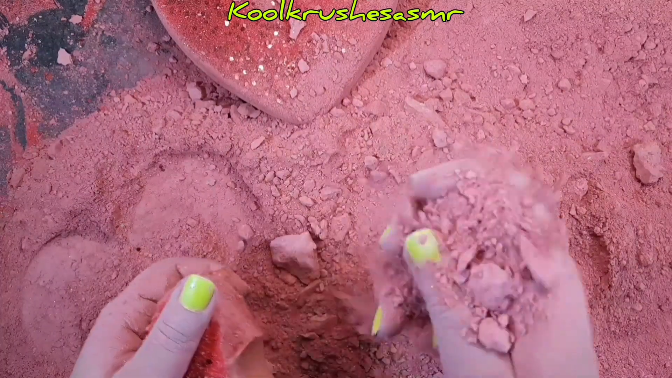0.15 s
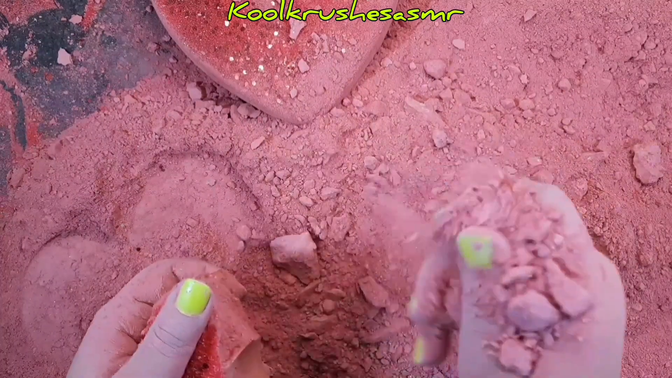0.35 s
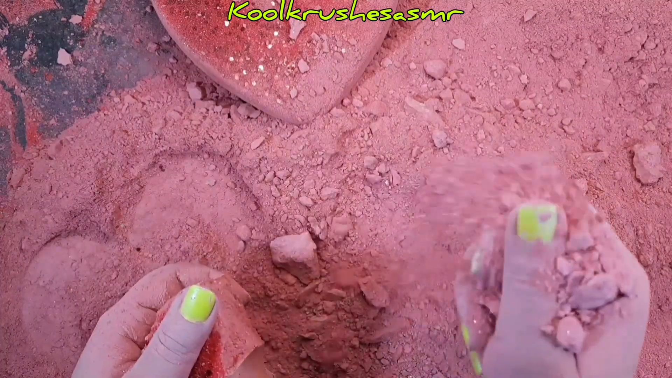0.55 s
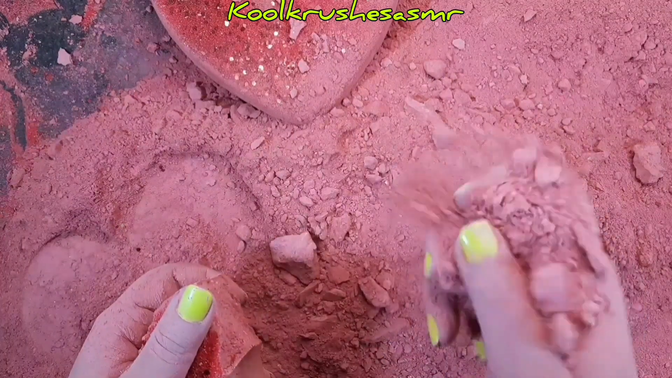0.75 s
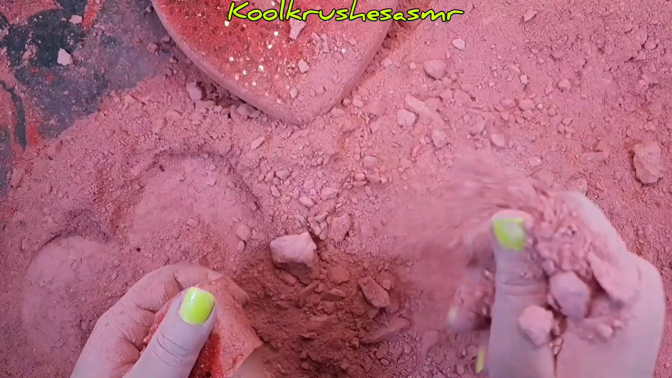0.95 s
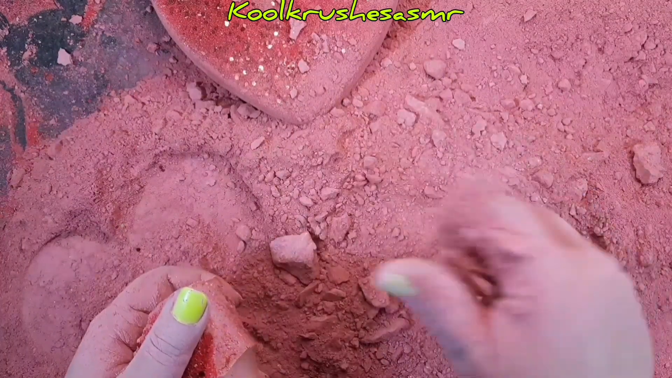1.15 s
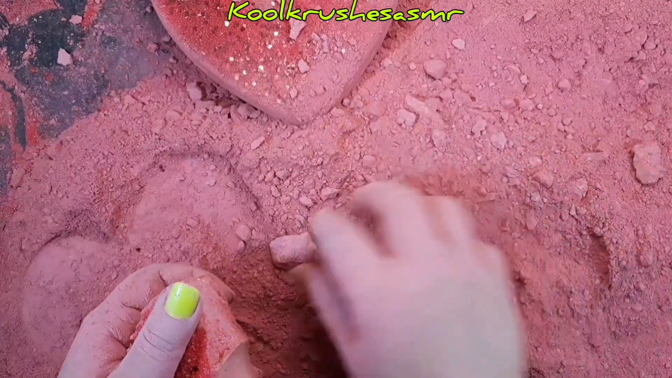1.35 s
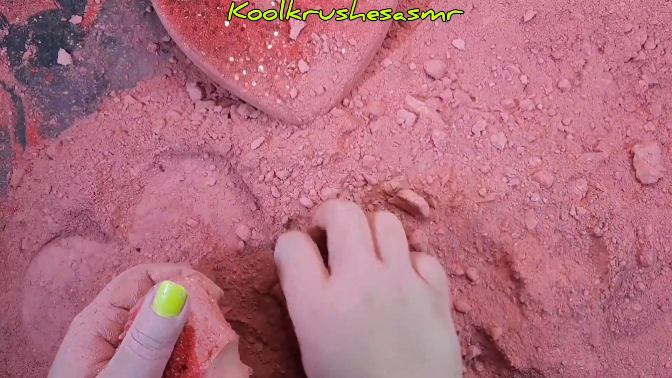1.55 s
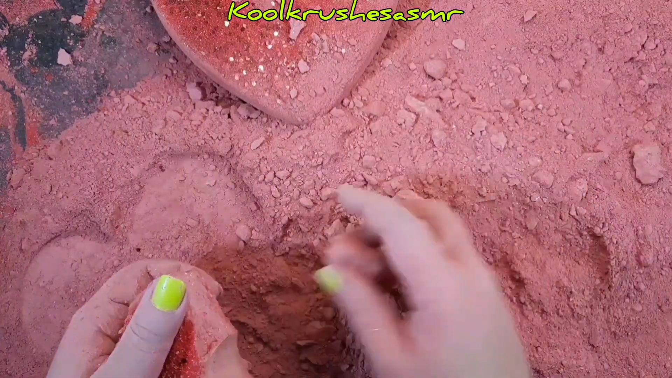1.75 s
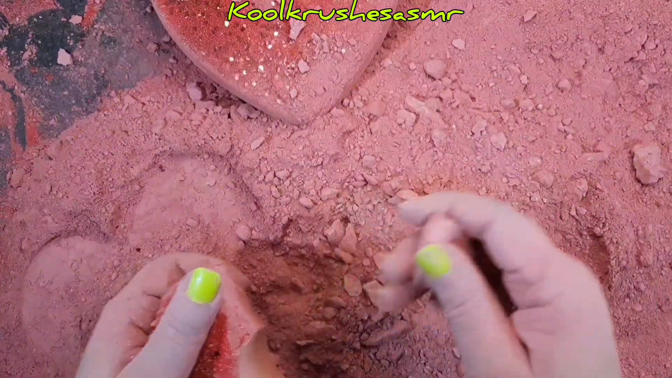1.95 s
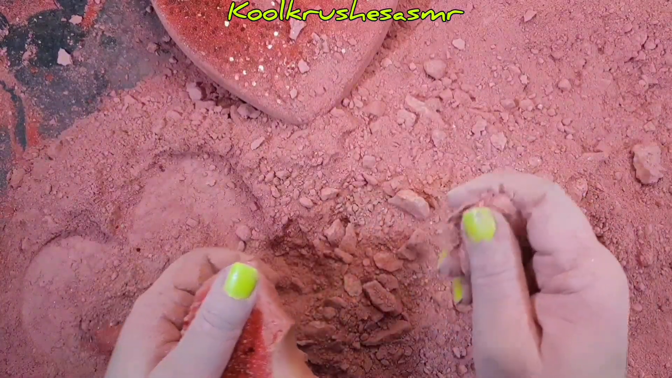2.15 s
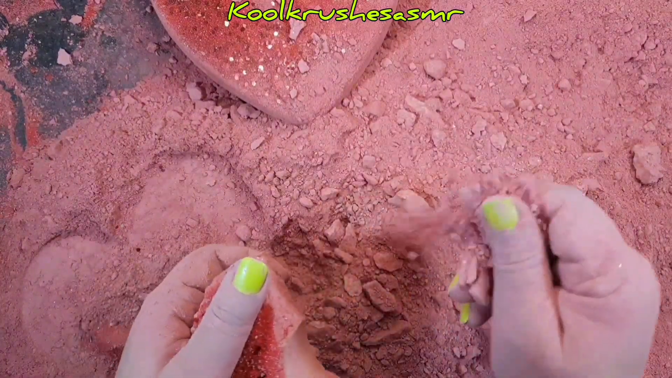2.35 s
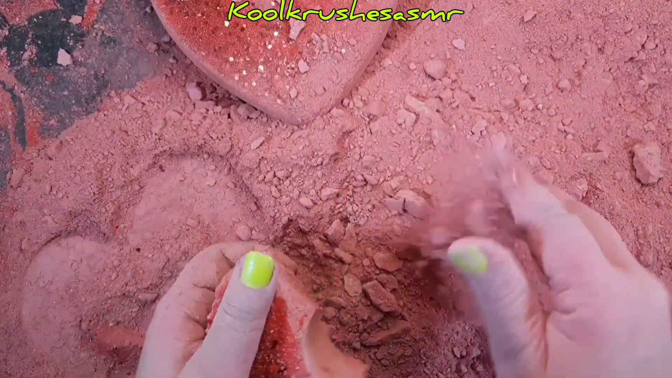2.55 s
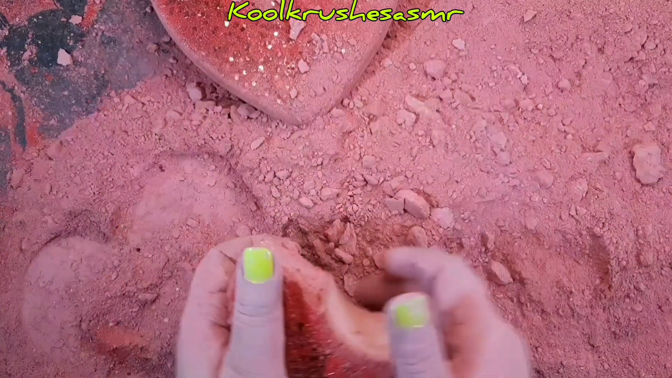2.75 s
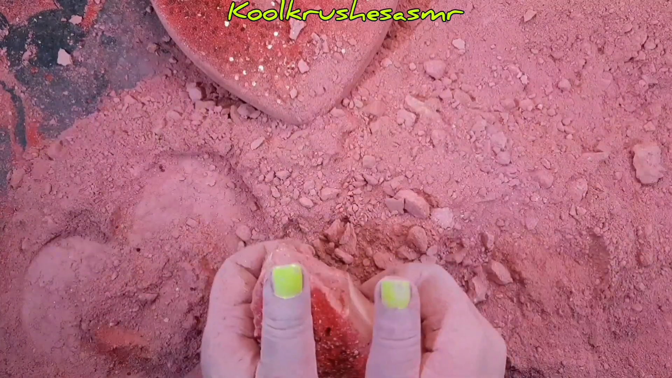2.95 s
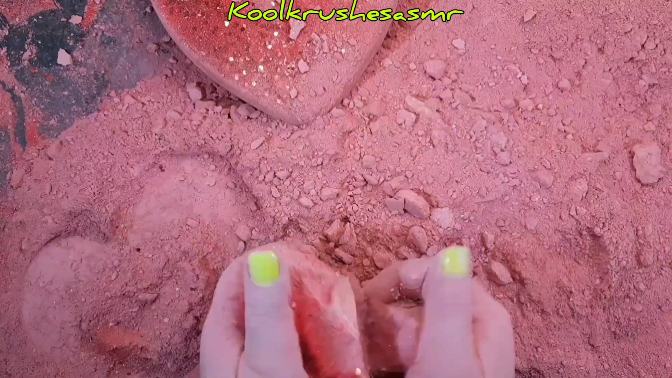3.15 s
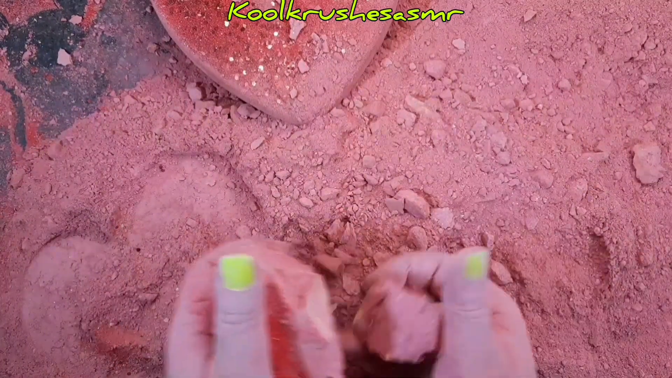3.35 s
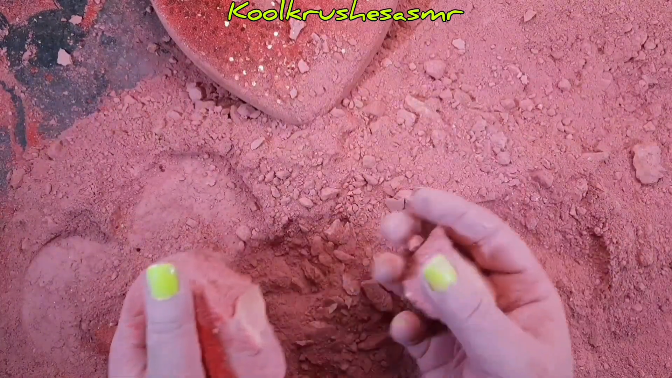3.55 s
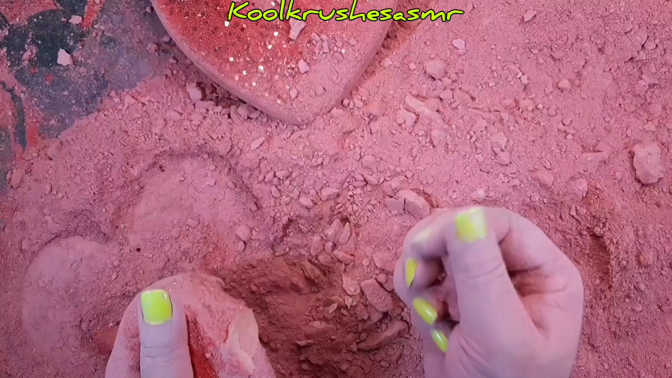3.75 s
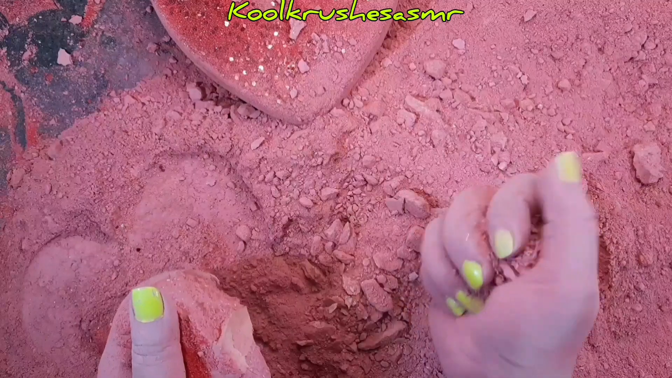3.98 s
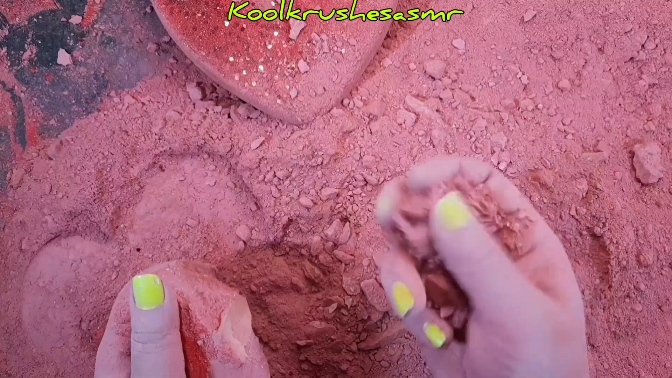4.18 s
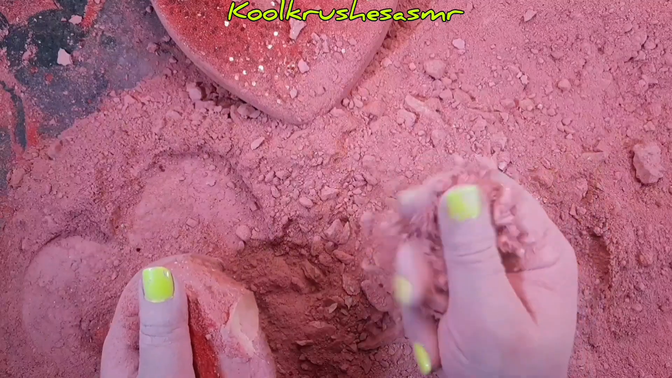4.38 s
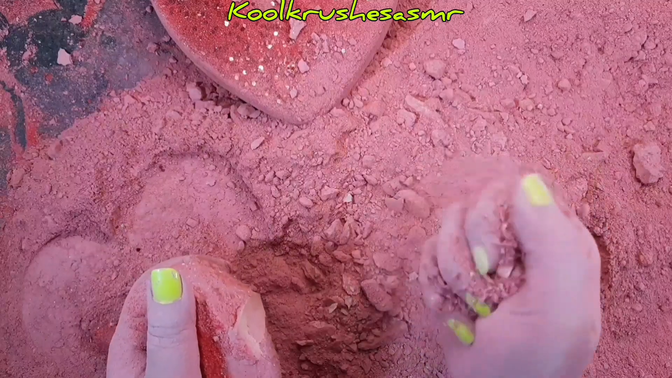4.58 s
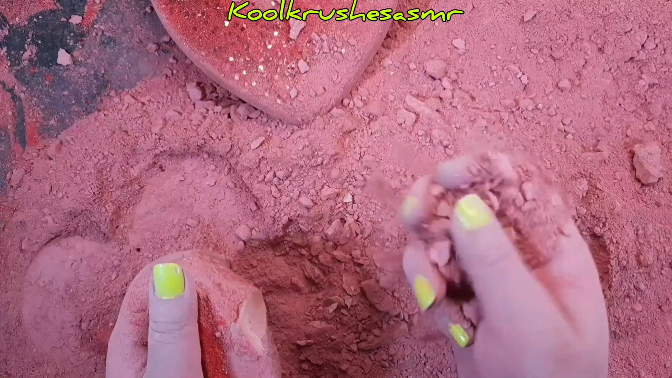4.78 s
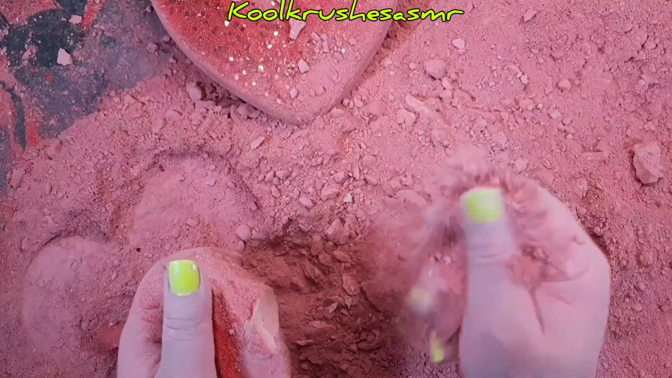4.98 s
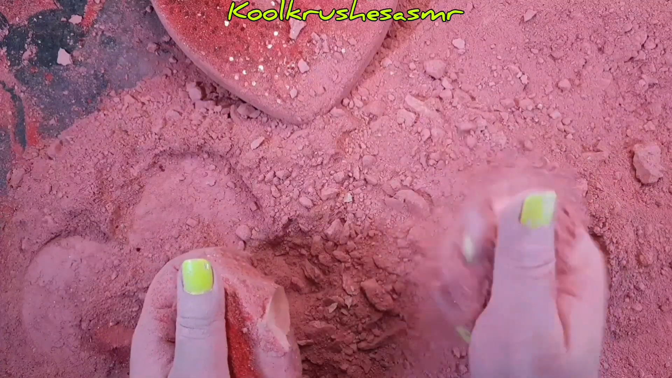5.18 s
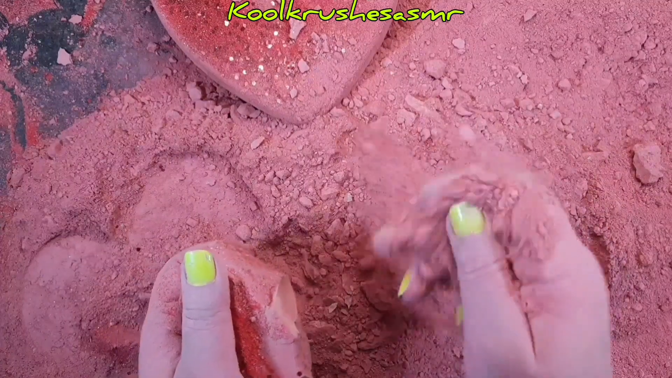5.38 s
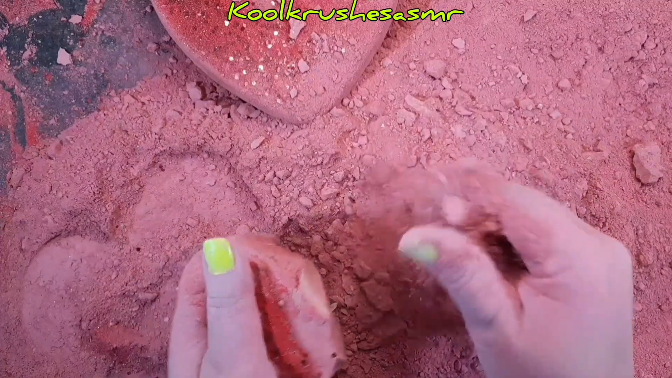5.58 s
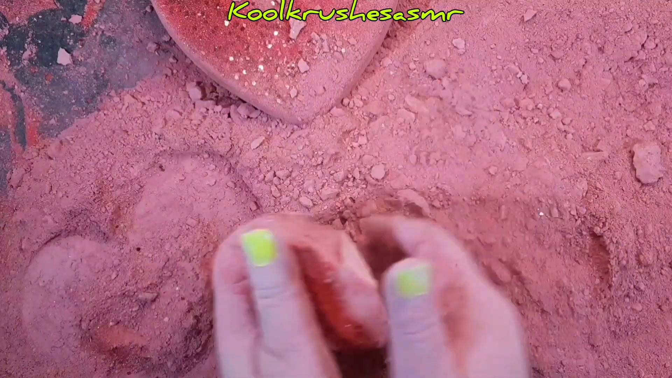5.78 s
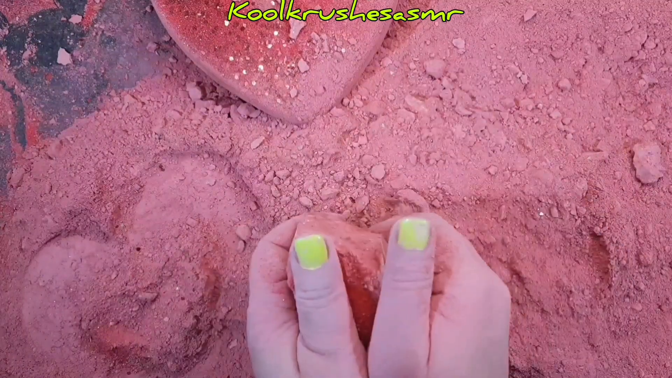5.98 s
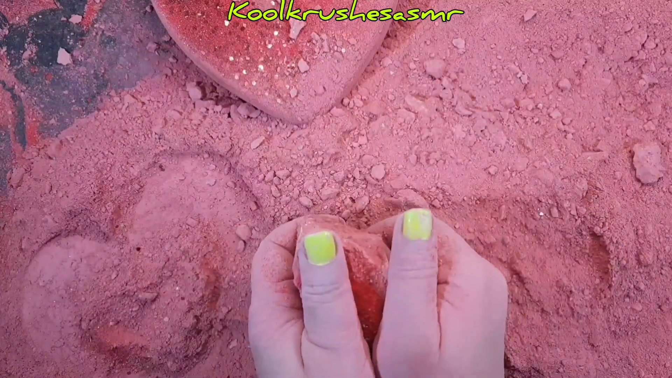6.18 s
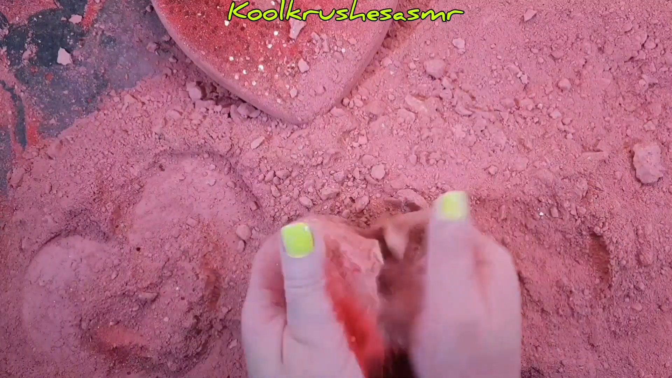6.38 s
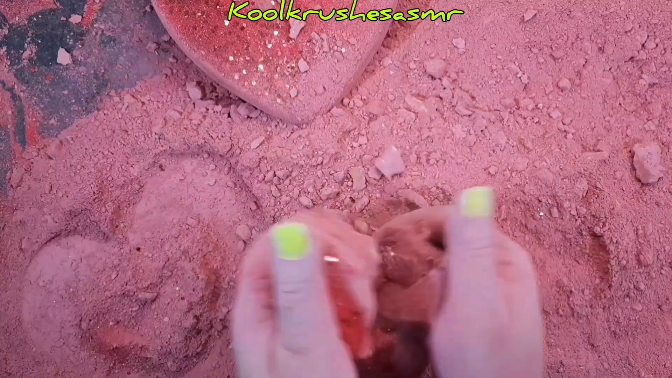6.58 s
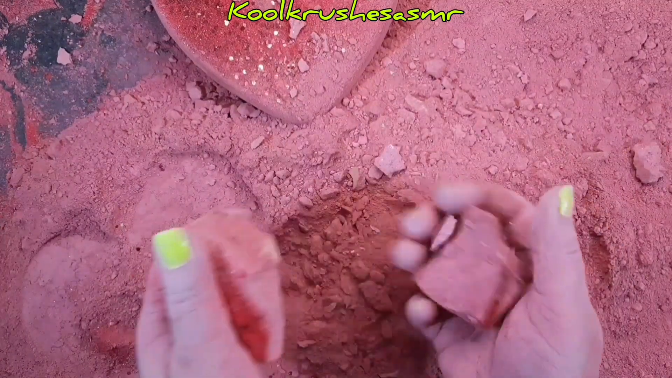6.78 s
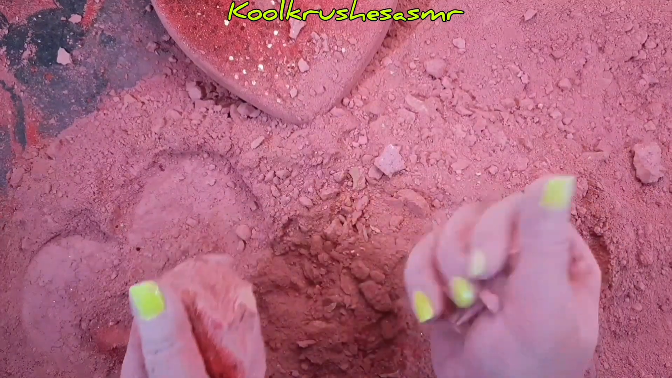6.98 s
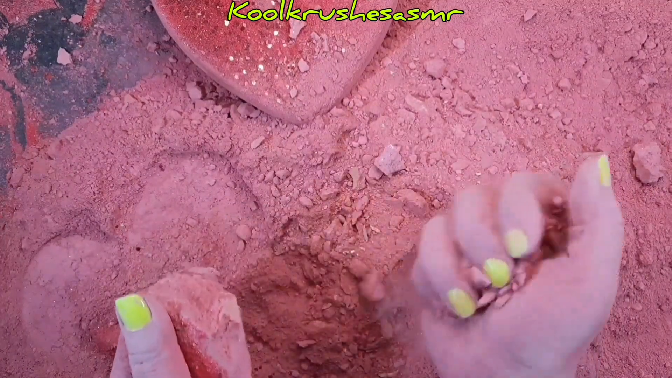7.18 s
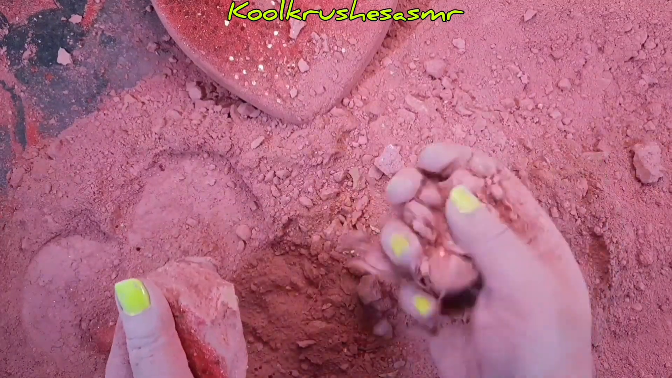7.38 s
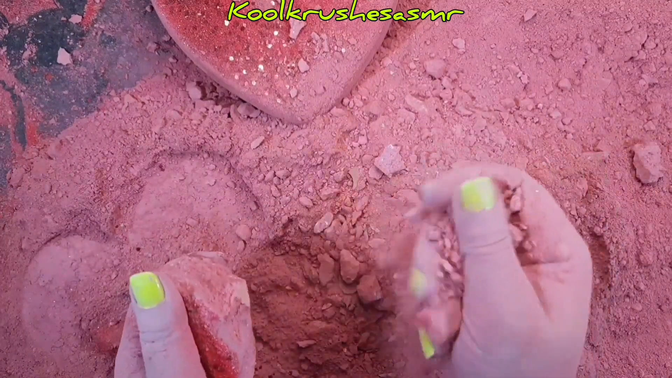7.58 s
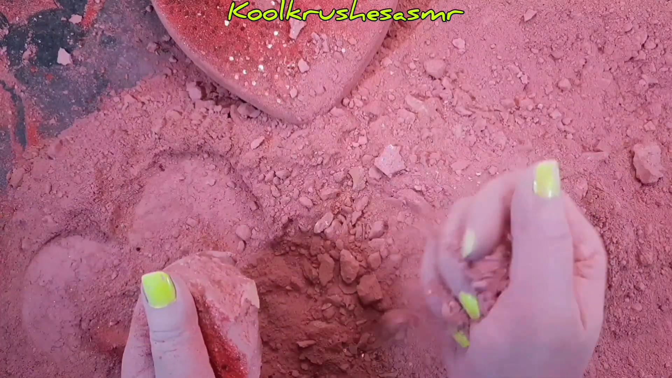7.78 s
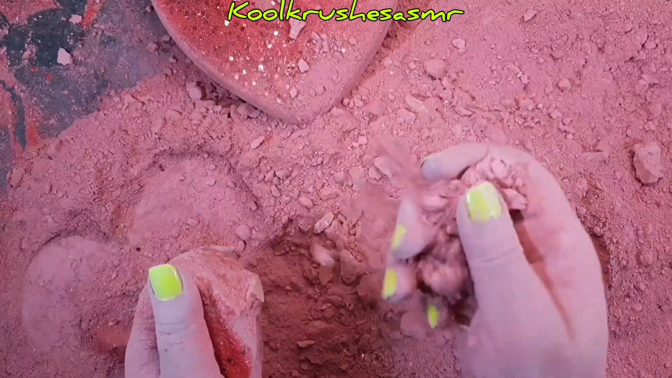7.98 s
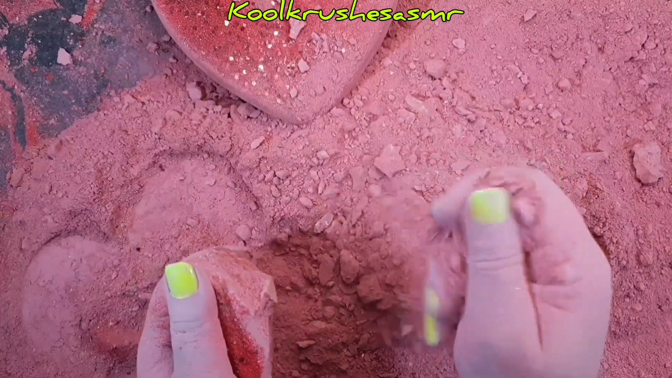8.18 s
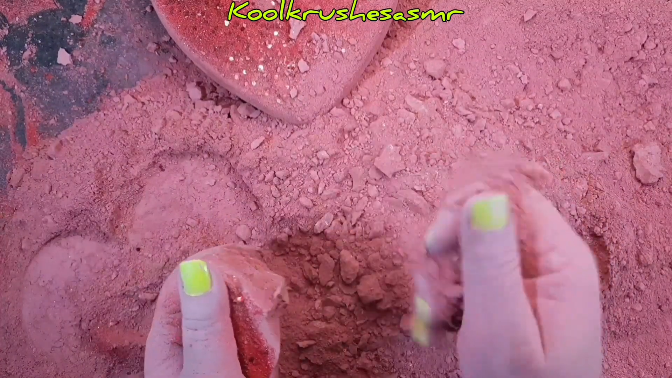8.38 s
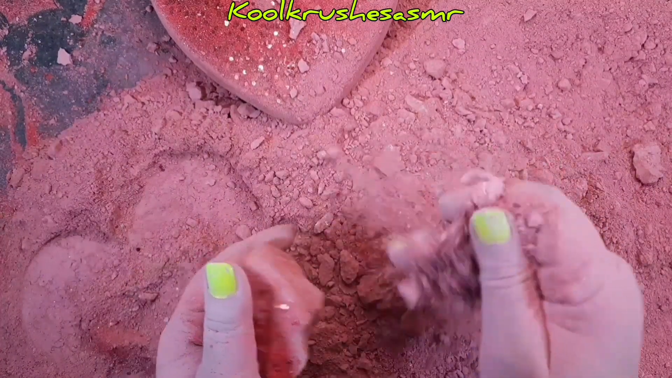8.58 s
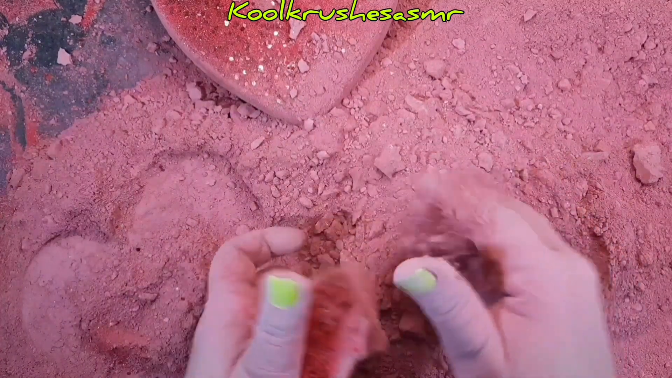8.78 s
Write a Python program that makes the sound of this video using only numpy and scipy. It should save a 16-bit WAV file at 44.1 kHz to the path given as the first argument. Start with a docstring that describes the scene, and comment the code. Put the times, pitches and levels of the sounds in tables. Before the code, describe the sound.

Dry chalk lumps crack and crumble in a squeezing hand, gritty crunches and powdery sifting up close over a faint hum and hiss.

```python
"""You first hear dry chalk crumbling and grinding under a hand, over a faint hum, whine and hiss.
Sharp cracks soon join in as lumps break; dull low knocks come later, as the hand hits the tray.
Crumbs and powder are streams of tiny noise bursts; each crack is two thuds plus a spray of noise.
The tray and a small bare room ring on after the chalk. The microphone is close and straight ahead."""
import sys
import numpy as np
from scipy import signal
from scipy.fft import rfft, irfft
from scipy.io import wavfile
from scipy.ndimage import uniform_filter1d

SR = 44100
rng = np.random.default_rng(int(sys.argv[2]) if len(sys.argv) > 2 else 0)


def transcribe(signal):
    """Save signal, clipped to [-1, 1], as a 16-bit WAV file at the path in sys.argv[1]."""
    frames = np.atleast_2d(signal).T
    limited = np.clip(frames, -1, 1)
    pcm = np.round(limited * 32767).astype(np.int16)
    wavfile.write(sys.argv[1], SR, pcm)


N = 389844   # length [samples]

# Pushes of the fingers; levels are relative settings:
# (start [s], rise [s], hold [s], crumbs [dB], grit [dB], powder [dB])
PUSHES = [(0.0, 0.0033, 0.01, -40.5, -45.5, -47), (0.117, 0.097, 0.21, -48, -51, -51.5),
          (0.478, 0.058, 0.2, -50, -55, -51.5), (0.771, 0.058, 0.3, -51, -55.5, -52),
          (1.207, 0.054, 0.041, -44.5, -50.5, -44), (1.412, 0.063, 0.089, -52, -63.5, -73),
          (2.021, 0.071, 0.11, -53.5, -58, -59.5), (2.175, 0.17, 0.17, -53, -57.5, -56.5),
          (2.521, 0.05, 0.044, -46.5, -54, -48), (2.856, .08, .02, -72, -74, -68),
          (3.11, 0.033, .01, -35, -42.5, -43.5), (3.153, 0.044, 0.091, -44.5, -60.5, -73),
          (3.281, 0.034, 0.084, -62.5, -86, -52.5), (3.546, .12, 0.12, -52, -58, -45),
          (3.752, .05, 0.017, -38, -41, -41), (3.843, 0.023, 0.11, -61, -53, -55),
          (4.01, 0.047, 0.36, -57.5, -62.5, -68), (4.224, 0.042, 0.16, -46.5, -44, -57.5),
          (4.402, 0.027, 0.083, -38.5, -42.5, -52.5), (4.524, 0.042, 0.083, -53, -60, -55.5),
          (4.712, 0.042, 0.22, -52.5, -57, -54.5), (4.9, 0.056, 0.025, -35.5, -67, -47.5),
          (5.038, 0.07, 0.037, -49, -50.5, -48), (5.13, 0.017, 0.079, -51.5, -60, -54.5),
          (5.288, 0.065, 0.19, -53.5, -53.5, -55), (5.565, 0.049, 0.077, -46, -54.5, -47),
          (5.835, 0.1, 0.017, -86, -70, -57.5), (5.94, 0.087, 0.29, -61.5, -72.5, -83),
          (6.339, 0.0076, 0.018, -31, -65, -48), (6.366, 0.012, 0.065, -35, -37, -62),
          (6.447, 0.035, 0.063, -45, -62, -62), (6.61, 0.038, 0.041, -64, -73, -62),
          (6.76, 0.19, .04, -52.5, -58.5, -51.5), (6.945, 0.0092, 0.0072, -55, -66, -44),
          (7.02, 0.037, 0.1, -52, -53, -53), (7.32, 0.15, 0.21, -46, -49, -53.5),
          (7.598, 0.026, 0.016, -47.5, -42.5, -46), (7.702, 0.084, .02, -46.5, -53, -52.5),
          (7.892, 0.17, 0.13, -48.5, -51, -57), (8.158, 0.014, 0.14, -48.5, -62, -57),
          (8.435, 0.12, 0.6, -52.5, -60, -50.5), (8.57, 0.016, 0.048, -43.5, -44.5, -56)]
# Level of each size of crumb when the hand is still:
# (falling crumbs [dB], crumbs [dB], grit [dB], fine grit [dB], powder [dB], dust [dB])
REST_DB = (-70.5, -79, -77.5, -80, -95.5, -69)
# Colour of the crumbs: (frequency [Hz], level [dB per Hz])
CRUMB_COLOUR = [(76, -50), (130, 2.5), (178, -6), (237, -4), (427, -8), (518, 3), (613, -10.5), (734, 4.5),
                (828, -4), (934, -3.5), (1390, -9.5), (1510, -9.5), (2300, -21), (2990, -39), (5060, -120)]
# Colour of grit and powder: (frequency [Hz], level [dB per Hz])
DUST_COLOUR = [(710, 3.5), (1200, 3.5), (1380, -7.5), (1490, -0.5), (1750, -4), (1950, -5), (3560, -6.5),
               (4180, -15), (4410, -14.5), (4860, -17), (5300, -7), (6710, -6.5), (7550, -14.5),
               (9270, -14), (15700, -25)]
# Colour of the background hiss and rumble: (frequency [Hz], relative level [dB per Hz])
FLOOR_COLOUR = [(18, -51), (30, -7), (59, 6.5), (75, 12), (105, 1.5), (134, -33.5), (301, 0.5),
                (412, -27.5), (4020, -17), (5090, -14), (5800, -54), (6610, -20.5), (15700, -16)]
# Hum tones, levels before they waver: (frequency [Hz], level [dB rms])
HUM_TONES = [(50, -61), (99.5, -64)]
# Thin whine, a narrow strip of noise: (frequency [Hz], width of each filter pass [Hz], level [dB rms])
WHINES = [(5744, 280, -64)]
# Lumps cracking; the last three levels are relative to the crack's size:
# (time [s], size [dB], thud [Hz], deep thud [dB], grit [Hz], grit [dB], snap [dB])
CRACKS = [(.167, -32, 696, -5, 1540, -12, -11), (.223, -19.5, 500, -9, 1530, -19, -32),
          (.269, -17, 720, -14, 2900, -11.5, -18), (0.309, -42, 540, -8, 1770, -15, -7),
          (0.412, -28, 750, 1.5, 3030, -24, -20), (.517, -31, 740, -22, 3220, -11, -16),
          (0.568, -32.5, 734, -22, 2800, 0, 3.5), (.609, -27.5, 716, -17, 2400, -3.5, -19),
          (.652, -28, 710, 0, 2640, -14, -6), (.786, -34.5, 748, -21, 2690, -6, -7),
          (.88, -24.5, 750, -13, 2720, -9, -33), (.974, -32, 538, 5.5, 2270, 0, -19),
          (.313, -19, 715, -29, 3010, -24, -11), (.353, -13.5, 756, -23, 2860, -19, -15.5),
          (.391, -24, 756, -7, 2950, 0.5, -10), (.468, -18, 830, -41, 1430, -16, -40),
          (.623, -24, 766, -6.5, 2600, -6.5, -8), (.687, -21, 724, -8, 2680, -13.5, -25),
          (.832, -24.5, 1070, -14, 1440, -7, -13), (.906, -23.5, 735, -13, 1810, -4.5, -9),
          (.948, -27.5, 970, -4, 1750, -3.5, -3), (.998, -11, 900, -40, 1300, -18.5, -35),
          (1.134, -30, 510, -18, 2620, -24, -22), (1.241, -33, 500, -21, 2350, -5, -16),
          (1.261, -32.5, 504, -16, 2370, -7, 0), (1.319, -17, 520, -8, 2300, -12, -17),
          (1.558, -30.5, 490, 0.5, 1470, -31, -25), (1.912, -51, 740, -25, 3980, -14, 8),
          (2.094, -11.5, 714, -43, 3000, -19.5, -17.5), (2.096, -15.5, 315, -43, 4500, -10, -15),
          (2.256, -25.5, 517, -35, 2630, -11.5, -38), (2.324, -23, 729, -30, 2420, -35, -33),
          (2.376, -36.5, 713, -8, 3130, -5, -10), (2.524, -20.5, 680, -22, 3010, -21, -17),
          (2.574, -22, 527, -6, 1540, -19, -33), (2.601, -17, 412, 2, 2420, -9.5, -12.5),
          (2.983, -42.5, 533, -24, 2150, -13, -1), (3.117, 0, 520, -16.5, 2930, -22.5, -15),
          (3.128, -13, 530, -1, 2500, -21, -1), (3.66, -38.5, 724, -27, 3040, -17, 9),
          (3.672, -27, 750, -23, 3980, -8.5, -1), (3.686, -22, 745, -37, 3770, -7, -19),
          (3.725, -26, 930, -24, 3670, -3, 0), (3.772, -20.5, 550, -40, 3570, -0.5, -9),
          (3.794, -19, 850, -5, 3500, -1, -24), (3.8, -15, 905, -21, 3520, 2, -22),
          (3.807, -10.5, 720, -40, 4350, 0, -14.5), (3.813, -16, 930, -8, 3520, 0, -35),
          (3.82, -11, 730, -44, 1550, -8, -5), (3.905, -7.5, 900, -13, 2400, -13.5, -33),
          (4.258, -22.5, 970, -13, 1450, -10, -45), (4.372, -23.5, 864, -19, 3100, -6, -40),
          (4.393, -16.5, 940, -15, 3020, -14, -41), (4.431, -13.5, 720, -38, 1480, -15, -42),
          (4.465, -20, 540, -18, 1580, -7.5, -32), (4.5, -35, 517, -14, 1660, 1, -30),
          (4.621, -18, 696, -12, 3060, -25, -32), (4.753, -29.5, 710, -29, 3230, -5, 2),
          (4.854, -23, 750, -32, 3260, -33, -24), (4.944, -4, 780, -8.5, 1450, -21, -46),
          (4.963, -15.5, 503, -3, 1490, -9, -13), (4.999, -16, 540, -23, 1570, -14, -36),
          (5.01, -26, 910, -7, 1450, -9, -30), (5.078, -16, 520, -11, 1810, -38, -20),
          (5.144, -30, 720, -16, 1620, -9, -12), (5.175, -31, 910, -1, 1570, -7.5, -6),
          (5.357, -26, 540, -28, 2160, -18, -23), (5.506, -33.5, 960, -33, 3020, -6, -20),
          (5.564, -26, 560, -7.5, 3190, -21, -8.5), (5.663, -34.5, 515, -26.5, 2900, 0, -3),
          (6.136, -33, 523, -30, 2310, -19, -6), (6.204, -30.5, 543, -37, 1500, -30, -32),
          (6.343, 5, 546, -12.5, 1360, -24, -31), (6.348, 0.5, 777, -19, 1640, -22, -23),
          (6.361, -4, 745, -19, 1445, -20, -22), (6.391, -9.5, 530, -10.5, 1400, -17, -21),
          (6.408, -2, 523, -9, 1860, -32, -31), (6.818, -49, 530, -23, 2940, -17, 8.5),
          (6.914, -31, 540, -15, 2190, -11, -3), (6.937, -29.5, 732, -2.5, 1720, -5, -16),
          (6.957, -7.5, 493, -11, 3300, -6.5, -14), (6.971, -3, 533, -12.5, 1410, -9.5, -12.5),
          (6.983, -4, 730, -41, 4000, -9, -33), (6.999, -12, 400, -14, 1560, -11, -35),
          (7.026, -9.5, 530, -38, 1650, -9, -30), (7.033, -11.5, 490, -8, 1870, -21, -19),
          (7.065, -13, 530, -33, 1460, -6, -23), (7.187, -30.5, 477, -29, 3800, -3.5, -2),
          (7.425, -33, 740, -29, 1500, -8, -20), (7.63, -17, 530, -51, 3300, -4, -2.5),
          (7.643, -24, 500, -18, 3100, -8.5, 0.5), (7.668, -31, 734, -29, 3210, 1.5, -5),
          (7.745, -40, 510, -35, 2400, 5, 9.5), (7.788, -16, 493, -10.5, 2260, -18.5, -13),
          (8.039, -29, 528, -15, 2570, -25, -21), (8.059, -22, 1010, -32, 1460, -27, -11.5),
          (8.123, -18.5, 910, -27, 1570, -27, -36), (8.134, -25, 510, -15, 1550, -5, -32),
          (8.176, -24, 720, -4, 2600, 0.5, -32), (8.479, -37, 490, -15, 2360, -11, 3),
          (8.533, -30, 754, -13, 1470, -18, -23), (8.593, -19.5, 750, -19, 1490, -37, -31),
          (8.683, -24, 704, -12, 3000, -5.5, -13), (8.721, -25.5, 760, -22, 3040, -7, -7),
          (8.803, -35, 778, -30, 3020, 1, -9), (8.832, -35, 494, -10, 3000, -9, 3)]
# Ways in which tray and room ring: (frequency [Hz], relative level [dB], time to fall 60 dB [s])
RINGING_MODES = [(182.1, 7.5, 0.24), (235, -27, 0.43), (300.4, -2, 0.56), (398.3, 6, 0.26),
                 (528, -11.5, 0.38), (557.6, -2, 0.59), (717, -7, 0.39), (768, -5, 0.46), (983, 8.5, 0.23),
                 (1027, 15.5, 0.047), (1508, 3.5, 0.087)]
# Dense echoes from the walls: (frequency [Hz], time to fall 60 dB [s], relative level [dB])
WALLS = [(100, 0.46, -0.5), (300, 0.37, 4), (700, 0.53, -8.5), (1910, 0.32, 1.5), (4460, 0.28, 2),
         (10800, 0.15, 0)]
# Hand knocking the tray: (time [s], peak [dB], base pitch [Hz], swell [s])
BUMPS = [(4.975, -44, 103, 0.016), (5.088, -50, 128, 0.018), (6.05, -40, 82, 0.026),
         (6.349, -29, 125, 0.017), (8.125, -41, 84.5, 0.017)]

RISE_DB, RELEASE_DB_PER_S = 22, 212   # each push climbs this far, then dies away at this rate
FALLING_DB, FINE_GRIT_DB, DUST_DB = -2.0, -2, -33   # offsets from the sizes that each one follows
FINE_FROM_POWDER, DUST_FOLLOWS = 0.4, 0.54   # shares taken from the powder's level
GRINDING_HOLDS = 0.19   # a gritty, tight grind lets fewer crumbs fall
UNEVEN_DB, UNEVEN_PER_S = 0.5, 9.0   # every size comes and goes a little on its own
POWDER_PEAK_HZ, POWDER_PEAK_WIDTH_HZ = 8740, 1040   # sifting powder has a bright peak here
POWDER_PEAK_DB = -16.5   # gain of the filter that adds this peak
FLOOR_DB = -61.5   # hiss and rumble [dB rms]
HUM_WAVER, HUM_WAVER_PER_S = 0.35, 14.0   # the hum wavers: share of its height, new values per second
DEEP_HZ, DEEP_SPREAD_HZ = 252.6, 18   # pitch of the deep thud and its scatter
SPRAY_S, SPRAY_SPREAD = 0.011, 0.3   # length of the splinter spray and its scatter (natural log)
BUMP_SAG_PER_S = 6.0   # a knock starts high and sinks in pitch
CUTOFF_HZ = 15850   # top of the recorded sound


def from_db(db):
    """Turns a level in dB into a gain."""
    return 10 ** (np.asarray(db) / 20)


def rms_one(x):
    """Scales x to an average (rms) strength of 1."""
    return x / np.sqrt(np.mean(x ** 2) + 1e-20)


def peak_one(x):
    """Scales x to a peak of 1."""
    return x / np.abs(x).max()


def at_hz(points, hz):
    """Reads a table between its points, on a log-frequency axis."""
    table = np.array(points)
    return np.interp(np.log(hz), np.log(table[:, 0]), table[:, 1])


def band(x, low_hz, high_hz):
    """Keeps the part of x between two frequencies."""
    return signal.sosfilt(signal.butter(2, [low_hz, high_hz], "band", fs=SR, output="sos"), x)


def coloured(x, spectrum):
    """Gives x the spectrum through a short filter that never acts ahead of time."""
    hz = np.linspace(1, SR / 2, 2049)
    cepstrum = irfft(at_hz(spectrum, hz) * np.log(10) / 20)
    # folding the cepstrum onto its first half gives a filter that acts as early as it can
    cepstrum[1:2048] *= 2
    cepstrum[2049:] = 0
    short_filter = irfft(np.exp(rfft(cepstrum)))
    return signal.fftconvolve(x, short_filter)[:len(x)]


def resonance(x, hz, width_hz):
    """Passes x through one resonant peak; a narrow peak rings longer."""
    radius = np.exp(-np.pi * width_hz / SR)
    angle = 2 * np.pi * hz / SR
    return signal.lfilter([1, 0, -1], [1, -2 * radius * np.cos(angle), radius * radius], x)


def ringing(t, t60_share=1):
    """Adds up the ringing modes, each a sine that dies away; t60_share shortens them all."""
    return sum(from_db(db - 60 * t / (t60 * t60_share)) * np.sin(2 * np.pi * hz * t)
               for hz, db, t60 in RINGING_MODES)


def pushes():
    """Levels in dB of crumbs, grit and powder: every push rises, holds and dies away; overlaps add."""
    t = np.arange(0, N + 64, 64) / SR
    power = 1e-12
    for start_s, rise_s, hold_s, *levels_db in PUSHES:
        rise = np.clip((t - start_s) / max(rise_s, .002), 0, 1)
        since_release_s = np.maximum(t - start_s - rise_s - hold_s, 0)
        shape_db = -RISE_DB * (1 - rise) - RELEASE_DB_PER_S * since_release_s
        push_gain = from_db(shape_db + np.reshape(levels_db, (-1, 1)))
        power = power + (t >= start_s) * push_gain ** 2
    return t, 10 * np.log10(power)


def grains(per_s, spread_db, burst_s, smooth):
    """Random fractures of uneven size, each a brief noise burst, over a smooth share of sliding powder."""
    born = rng.random(N) < per_s / SR
    sizes = born * from_db(spread_db * np.minimum(rng.exponential(1, N), 3))
    bursts = signal.lfilter([1], [1, -np.exp(-1 / (burst_s * SR))], sizes)
    envelope = rms_one(bursts) + smooth
    # the hand's effort sets the power, however it is split into grains
    work = np.sqrt(uniform_filter1d(envelope ** 2, size=SR // 12))
    return envelope / work * rng.standard_normal(N)


def layer(spectrum, low_hz, high_hz, count, **grain):
    """Separate grain streams, each in its own part of the band, summed and coloured; rms 1."""
    edges = np.geomspace(low_hz, high_hz, count + 1)
    streams = sum(band(grains(**grain), low, high) for low, high in zip(edges, edges[1:]))
    return rms_one(coloured(streams, spectrum))


def crumbling():
    """Crumbs thud on the tray and crunch in the fist, finer ones grate, powder hisses."""
    t, (crumbs_db, grit_db, powder_db) = pushes()
    falling_db = crumbs_db + FALLING_DB - GRINDING_HOLDS * (grit_db - crumbs_db)
    fine_db = grit_db + FINE_FROM_POWDER * (powder_db - grit_db) + FINE_GRIT_DB
    dust_db = DUST_DB + DUST_FOLLOWS * powder_db
    levels_db = np.array([falling_db, crumbs_db, grit_db, fine_db, powder_db, dust_db])
    knots = rng.standard_normal((6, 400))
    uneven = [np.interp(t * UNEVEN_PER_S, np.arange(len(k)), k) for k in knots]
    levels_db += UNEVEN_DB * np.array(uneven)
    gains = np.hypot(from_db(levels_db), from_db(REST_DB)[:, None])

    falling = layer(CRUMB_COLOUR, 160, 422, count=1, per_s=80., spread_db=4.5, burst_s=0.0045, smooth=0.41)
    crumbs = layer(CRUMB_COLOUR, 468, 985, count=2, per_s=90., spread_db=7.0, burst_s=0.0035, smooth=0.055)
    grit = layer(CRUMB_COLOUR, 1006, 2020, count=2, per_s=220., spread_db=4.0, burst_s=0.004, smooth=0.3)
    fine = layer(DUST_COLOUR, 2150, 4450, count=2, per_s=150., spread_db=2.5, burst_s=0.0025, smooth=0.7)
    powder = layer(DUST_COLOUR, 5760, 10650, count=2, per_s=260., spread_db=2.0, burst_s=0.0021, smooth=0.5)
    dust = layer(DUST_COLOUR, 12000, 22000, count=1, per_s=380., spread_db=3.0, burst_s=0.0018, smooth=0.6)
    bright = resonance(powder, POWDER_PEAK_HZ, POWDER_PEAK_WIDTH_HZ)
    powder = rms_one(powder + from_db(POWDER_PEAK_DB) * bright)

    sizes = [falling, crumbs, grit, fine, powder, dust]
    return sum(np.interp(np.arange(N) / SR, t, gain) * x for gain, x in zip(gains, sizes))


def background():
    """Hiss and rumble are coloured noise, the hum is wavering sines, the whine is narrow noise."""
    t = np.arange(N) / SR
    out = from_db(FLOOR_DB) * rms_one(coloured(rng.standard_normal(N), FLOOR_COLOUR))
    for hz, db in HUM_TONES:
        drift = np.interp(t * HUM_WAVER_PER_S, np.arange(200), rng.standard_normal(size=200))
        waver = 1 + HUM_WAVER * drift
        out += from_db(db) * waver * np.sqrt(2) * np.sin(2 * np.pi * hz * t)
    for hz, width_hz, db in WHINES:
        once = resonance(rng.standard_normal(N), hz, width_hz)
        out += from_db(db) * rms_one(resonance(once, hz, width_hz))
    return out


def soft_thud(t, hz):
    """A sine that fades within about two cycles, with a softened start."""
    return -np.sin(2 * np.pi * hz * t) * np.exp(-t * hz / 1.54) * np.minimum(t * hz * 2, 1)


def cracks():
    """Each crack is a soft thud, a deeper one under it, and splinters that spray over its length."""
    length = 4096   # samples kept for each crack
    out, t = np.zeros(N + length), np.arange(length) / SR
    noise = rng.standard_normal((len(CRACKS), 3, length))
    for crack, (noise_a, noise_b, noise_c) in zip(CRACKS, noise):
        start_s, size_db, thud_hz, deep_db, grit_hz, grit_db, snap_db = crack
        deep_hz = DEEP_HZ + DEEP_SPREAD_HZ * noise_a[0]
        spray_s = SPRAY_S * np.exp(SPRAY_SPREAD * noise_b[0])
        age = 4 * t / spray_s
        spray = np.sqrt(age) * np.exp(-age)

        rough = peak_one(band(noise_c * spray, 212, 790))   # the break is ragged
        grit = peak_one(band(coloured(noise_a * spray, DUST_COLOUR), 940, 5600))
        grit = grit + 0.8 * peak_one(resonance(grit, grit_hz, 1100))
        snap = peak_one(band(coloured(noise_b * spray, DUST_COLOUR), 6000, 16000))

        burst = 0.64 * soft_thud(t, thud_hz) + 0.26 * rough
        burst += from_db(deep_db) * soft_thud(t, deep_hz)
        burst += from_db(grit_db) * grit + from_db(snap_db) * snap
        at = round(start_s * SR)
        out[at:at + length] += from_db(size_db) * burst
    return out[:N]


def tray(x, ring_db, t60_share):
    """The tray answers at once with the same modes as the room, damped quickly by the powder."""
    ring = ringing(np.arange(SR // 4) / SR, t60_share)
    return x + from_db(ring_db) * signal.fftconvolve(x, ring)[:N]


def room(x, modes_db, walls_db, build_s):
    """Echoes: ringing modes plus dense reflections that build up, then die at a rate set by pitch."""
    t = np.arange(SR) / SR
    edges = 80 * 2 ** np.arange(0, 8, .5)   # half-octave bands [Hz]
    centres = np.sqrt(edges[1:] * edges[:-1])
    t60s = at_hz(WALLS, centres)
    levels_db = at_hz(np.array(WALLS)[:, ::2], centres)   # frequency and level columns
    white = rng.standard_normal((2, SR))
    walls = sum(band(white[k % 2], edges[k], edges[k + 1]) * from_db(levels_db[k] - 60 * t / t60s[k])
                for k in range(len(centres)))
    build_up = 1 - np.exp(-t / build_s)
    echo = (from_db(modes_db) * ringing(t) + from_db(walls_db) * walls) * build_up
    return signal.fftconvolve(x, echo)[:N]


def bumps():
    """Dull low knocks: sines that swell and fade in a few cycles while their pitch sinks."""
    out, t = np.zeros(N), np.arange(N) / SR
    for start_s, peak_db, hz, swell_s in BUMPS:
        since_s = t - start_s
        age = np.maximum(since_s, 0) / swell_s
        swell = age * np.exp(1 - age)
        sag = 1.15 - BUMP_SAG_PER_S * np.clip(since_s, 0, .06)
        out += from_db(peak_db) * swell * np.sin(2 * np.pi * hz * since_s * sag)
    return out


def scene():
    """Chalk on the tray, in the room, straight ahead of the microphone: both channels alike."""
    chalk = tray(band(crumbling() + cracks(), 167, 19000), ring_db=-51.0, t60_share=0.055)
    echoes = room(chalk, modes_db=-59.0, walls_db=-33, build_s=0.0095)
    mid = chalk + echoes + bumps() + background()
    return np.array([mid, mid])


def record(dry):
    """Peaks beyond 0.95 clip, a faint hiss is added with opposite sign in each channel, the top is cut."""
    side = from_db(-74) * band(rng.standard_normal(N), 200, 8500)
    clipped = np.clip(dry, -.95, .95) + side * [[1], [-1]]
    return signal.sosfilt(signal.ellip(12, .3, 70, CUTOFF_HZ, fs=SR, output="sos"), clipped)


dry = scene()
out = record(dry)
transcribe(out)
```